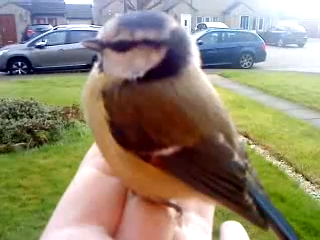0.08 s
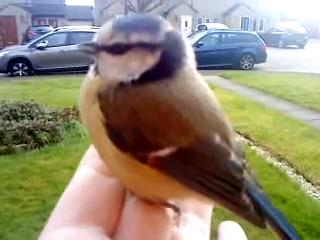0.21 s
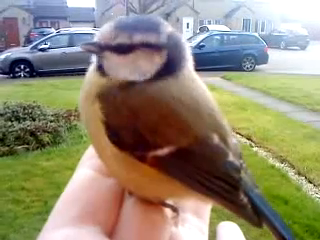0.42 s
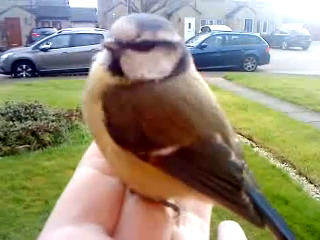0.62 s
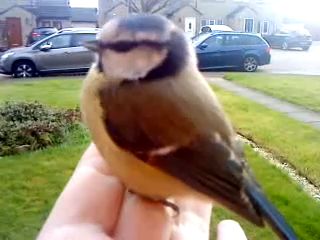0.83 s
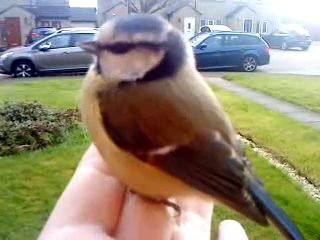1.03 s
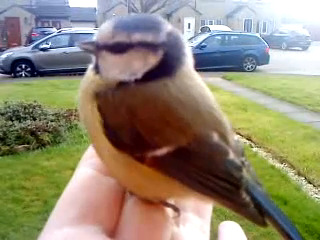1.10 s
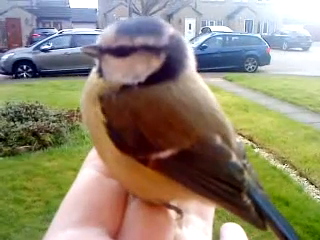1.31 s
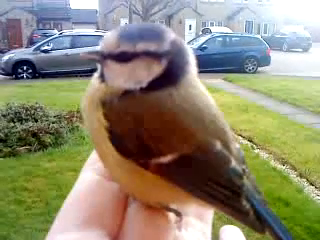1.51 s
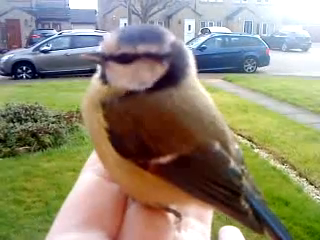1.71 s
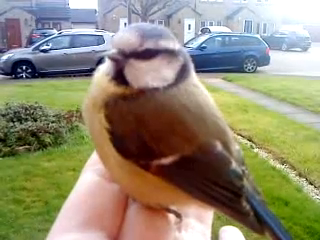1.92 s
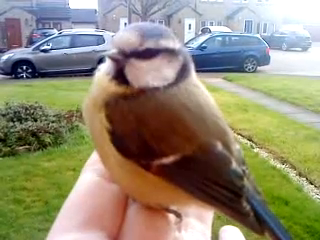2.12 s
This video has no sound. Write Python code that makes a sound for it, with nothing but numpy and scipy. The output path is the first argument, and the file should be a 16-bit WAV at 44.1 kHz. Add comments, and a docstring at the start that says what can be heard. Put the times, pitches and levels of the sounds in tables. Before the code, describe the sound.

Quick scratchy chirps from a tiny garden bird, following wind buffets and low thumping outdoors

```python
"""Wind buffets and thumps a microphone in a garden, over a distant engine, soft air hiss and an early swish.
Then a small tit perched on a hand gives seven short, dry, rasping calls close by, among soft ticks of noise.
Each call is a quick rattle of sharp pulses that ring near 4 kHz, with short echoes from the surroundings.
During the early calls a second bird far away gives two thin, falling whistles, made from gliding sine waves.
Wind, hiss and ticks are filtered noise, each thump is one smooth push, and the engine is a few sine waves."""
import sys
import numpy as np
from scipy import signal
from scipy.fft import rfft, irfft
from scipy.io import wavfile
from scipy.ndimage import uniform_filter1d

SR = 44100
rng = np.random.default_rng(int(sys.argv[2]) if len(sys.argv) > 2 else 0)


def wrap_up_sound(samples):
    """Save the sound to the file named by the first command line argument, as 16-bit audio."""
    columns = np.atleast_2d(samples).T
    # keep every value between -1 and 1, then stretch to whole-number steps
    tamed = np.clip(columns, -1, 1)
    steps = np.round(tamed * 32767).astype(np.int16)
    wavfile.write(sys.argv[1], SR, steps)


N = 94815
T = np.arange(N) / SR  # time of every sample, in seconds

# Near calls, two quick rattles each: an opening, then a run of closer pulses.
# Columns: start t/s, number of pulses, gap t/s, level/dB, fade per pulse/dB (negative grows), pitch f/Hz, rasp/dB
RATTLES = [ (.8310, 2, 0.0057, -23, -1.5, 4140, -21), (.8440, 7, 0.0028, -28, 0.9, 4040, -28),
           (1.0409, 1, .003, -8, 1, 3970, -19), (1.0434, 5, 0.0019, -6.5, 0.9, 3920, -17.5),
           (1.2060, 1, .003, -8.5, 2, 4050, -13), (1.2107, 3, 0.0018, -7.5, 3.5, 3830, -17),
           (1.3592, 1, .003, -8.5, 2, 3950, -17.5), (1.3647, 3, 0.0019, -21.5, 6, 3900, -7),
           (1.5153, 1, 0.0027, -14, 2, 4100, -30), (1.5189, 4, .0017, -12, -0.5, 3970, -10),
           (1.6920, 2, 0.0017, -5.5, 3, 4020, -25), (1.6963, 3, 0.0016, -9.5, 3.5, 3930, -12.5),
           (1.8511, 2, 0.003, -14, 2, 4100, -24), (1.8595, 5, .0022, -11, 3, 3890, -9)]
# Small unevenness from pulse to pulse; the tuning is a fraction of the pitch
TIMING_SPREAD_S, STRENGTH_SPREAD_DB, TUNING_SPREAD = 0.00018, 0.9, 0.019

# Resonances of throat and beak at the reference pitch: f/Hz, width/Hz, level/dB
THROAT_RESONANCES = [(600, 380, -22.5), (2000, 440, -18.5), (3084, 1070, -14), (3730, 920, 3),
                     (4113, 483, 2.5), (5720, 520, -16), (7300, 240, -31.5)]
# Starting direction of each resonance: +1 or -1
THROAT_SIGNS = [1, 1, 1, 1, -1, -1, -1]
REFERENCE_HZ, PULSE_LENGTH_S, PULSE_ATTACK_S = 4000, 0.008, 0.00015
RASP_PEAK_S, RASP_LOW_HZ, RASP_HIGH_HZ = 0.00066, 1630, 4860  # breathy burst on every pulse

# Short soft noise bursts around the calls: centre t/s, length t/s, level/dB, wide hiss against narrow band/dB
NOISE_BURSTS = [(.691, 0.0045, -45.5, -21), (.8765, 0.0045, -43, -16), (1.037, 0.014, -36, -4),
                (1.056, .003, -42, -17), (1.217, 0.0034, -35, -17), (1.246, 0.024, -50, 0),
                (1.387, 0.0035, -45, -3), (1.542, .003, -37.5, 0), (1.669, 0.0064, -41, 7),
                (1.713, 0.0043, -40, 1.5), (1.880, 0.013, -42, -1.5), (1.987, 0.0023, -49.5, -6),
                (2.108, 0.011, -49.5, -3)]
BURST_HZ, BURST_WIDTH_HZ, BURST_LOW_HZ, BURST_HIGH_HZ = 4080, 450, 1500, 7000

# Echo strength, and the time each echo takes to fall by 60 dB
ECHO_DB, ECHO_T60_S, TAIL_DB, TAIL_T60_S = -14, 0.025, -21, 0.11

# Far whistles: start t/s, length t/s, start f/Hz, end f/Hz, level/dB
WHISTLES = [(.89, .13, 7520, 6850, -66), (1.125, .11, 7380, 6850, -66)]
WHISTLE_WAVER_HZ, WHISTLE_FLICKER_DB = 50, 2.5

# Wind strength at the microphone: t/s, level/dB
WIND = [(0, -51), (.16, -43.5), (.25, -32), (.32, -42.5), (.48, -35), (.59, -23), (.70, -30), (.78, -23.5),
        (.89, -30), (.94, -33), (1.18, -31.5), (1.24, -23.5), (1.30, -34.5), (1.47, -33), (1.60, -27),
        (1.68, -33), (1.78, -42), (2.15, -39.5)]
WIND_LOW_HZ, WIND_HIGH_HZ = 13, 68.4
# Buffeting has level BUFFET_DB in a strong wind and gains BUFFET_GROWTH dB per dB of wind
BUFFET_HIGH_HZ, BUFFET_DB, BUFFET_GROWTH, STRONG_WIND_DB = 139, -26, 1.91, -25.5
# Gusts that break into flutter: start t/s, length t/s, level/dB, upper edge f/Hz
GUSTS = [(0.382, 0.056, -37, 228), (0.509, 0.027, -29, 242), (.567, 0.063, -21, 260.5),
         (0.634, 0.041, -31, 290), (.738, 0.081, -26.5, 261), (0.755, 0.022, -32.5, 532),
         (0.841, 0.0245, -27.5, 292), (1.204, 0.053, -32, 246)]
GUST_LOW_HZ, GUST_ATTACK_S, GUST_RELEASE_S = 94, 0.005, 0.014
# Single eddies thump the microphone: centre t/s, peak level/dB, pitch f/Hz
THUMPS = [(0.251, -24, 31), (0.403, -20.5, 39.3), (.526, -14, 85), (.767, -11.5, 69), (0.88, -13.5, 59),
          (1.029, -16, 93), (1.084, -24.5, 44.5), (1.136, -14.5, 60.5), (1.2228, -13, 263),
          (1.378, -14.5, 116), (1.515, -11, 102.6), (1.548, -11.5, 88), (1.671, -19.5, 70)]
THUMP_REBOUND = 1.37  # how strongly the pressure swings the other way before and after the peak

# Distant engine: t/s, firing rate f/Hz, level/dB
ENGINE = [(0, 152.4, -50), (.3, 144.4, -45.5), (.55, 140.9, -52.5), (1.3, 135.6, -54), (1.95, 123.8, -51.5),
          (2.15, 123.5, -53)]
# Engine tones: multiple of the firing rate, level/dB
ENGINE_ORDERS = [(1, -0.5), (2, 2.5), (3, -11.5)]
ENGINE_WAVER, ENGINE_FLICKER_DB = 0.0154, 4  # the waver is a fraction of the firing rate

# Soft mid-range hiss that dies away early: t/s, level/dB
SWISH = [(0, -65), (.3, -58), (.55, -64), (.8, -79)]
SWISH_HZ, SWISH_WIDTH_HZ = 2480, 2200

# Tone colour of the outdoor hiss: f/Hz, relative level per Hz/dB
AIR_COLOUR = [(20, 1), (100, -10), (200, -10.5), (380, -12.5), (550, -22), (1000, -26), (2000, -31),
              (4000, -33), (5200, -37), (7500, -40.5), (9000, -52)]
# Slow changes of the outdoor hiss: t/s, level/dB relative to AIR_DB
AIR_LEVEL = [(0, 1.5), (.5, 1), (1.1, 1), (2.15, 2)]
AIR_DB = -43.5

CUTOFF_HZ = 9400


def from_db(db):
    """Turn decibels into a gain."""
    return 10 ** (np.asarray(db) / 20)


def rms_one(x):
    """Scale a sound to an average strength (rms) of 1."""
    return x / np.sqrt(np.mean(x ** 2) + 1e-20)


def in_time(rows):
    """Join the rows of a table by straight lines, giving one curve per column after the time."""
    s, *columns = np.transpose(rows)
    return [np.interp(T, s, column) for column in columns]


def shaped_noise(gain_at):
    """Noise of strength 1 whose frequencies are weighted by a given function."""
    hz = np.maximum(np.fft.rfftfreq(N, 1 / SR), 1)
    spectrum = rfft(rng.standard_normal(N))
    return rms_one(irfft(spectrum * gain_at(hz), N))


def drift(rate_hz):
    """Slow random wandering around zero with a spread of 1."""
    return shaped_noise(lambda hz: 1 / (1 + (hz / rate_hz) ** 2))


def turbulence(low_hz, high_hz, steepness):
    """Tumbling air as low noise between two edges, with its slow swings in strength evened out."""
    def gain_at(hz):
        below = 1 + (low_hz / hz) ** 2
        above = 1 + (hz / high_hz) ** steepness
        return 1 / np.sqrt(below * above)

    noise = shaped_noise(gain_at)
    local_power = uniform_filter1d(noise ** 2, size=2600)  # average over about 59 ms
    return noise / np.sqrt(local_power + 1e-9)


def add(out, s, sound):
    """Mix a short sound in at a time in seconds."""
    i = int(s * SR)
    out[i:i + len(sound)] += sound[:max(N - i, 0)]


def pulse(pitch_hz, rasp_db):
    """One sharp pulse makes throat and beak ring for a millisecond or two, with a breathy burst of rasp."""
    t = np.arange(int(PULSE_LENGTH_S * SR)) / SR
    hz, width, db = np.transpose(THROAT_RESONANCES)[:, :, None]
    # A wider resonance dies away faster
    decay = np.exp(-np.pi * width * t)
    rings = from_db(db) * decay * np.sin(2 * np.pi * hz * pitch_hz / REFERENCE_HZ * t)
    attack = 1 - np.exp(-t / PULSE_ATTACK_S)

    band = signal.butter(2, [RASP_LOW_HZ, RASP_HIGH_HZ], "band", fs=SR, output="sos")
    breath = rms_one(signal.sosfilt(band, rng.standard_normal(len(t))))
    rasp = breath * t / RASP_PEAK_S * np.exp(-t / RASP_PEAK_S)
    return attack * (THROAT_SIGNS @ rings) + from_db(rasp_db) * rasp


def near_bird():
    """The tit's calls: rattles whose pulses are a little uneven in time, strength and pitch."""
    out = np.zeros(N)
    for s, count, gap, db, fade_db, hz, rasp_db in RATTLES:
        for k in range(round(count)):
            late, strong, sharp = rng.standard_normal(size=3)
            start = s + k * gap + TIMING_SPREAD_S * late
            gain = from_db(db - k * fade_db + STRENGTH_SPREAD_DB * strong)
            add(out, start, gain * pulse(hz * (1 + TUNING_SPREAD * sharp), rasp_db))
    return out


def noise_bursts():
    """Brief ticks and noise bursts around the calls, some closing a call: a narrow band plus wide hiss."""
    def wide_gain(hz):
        below = 1 + (BURST_LOW_HZ / hz) ** 6
        above = 1 + (hz / BURST_HIGH_HZ) ** 8
        return 1 / np.sqrt(below * above)

    core = shaped_noise(lambda hz: 1 / np.hypot(1, 2 * (hz - BURST_HZ) / BURST_WIDTH_HZ))
    hiss = shaped_noise(wide_gain)
    out = np.zeros(N)
    for s, length, db, bright_db in NOISE_BURSTS:
        swell = np.exp(-(2 * (T - s) / length) ** 2)
        out += from_db(db) * swell * rms_one(core + from_db(bright_db) * hiss)
    return out


def garden(x):
    """Quick scatter from hand and body, and a faint tail from the surroundings, as fading noise echoes."""
    out = np.zeros(N)
    for db, t60 in ((ECHO_DB, ECHO_T60_S), (TAIL_DB, TAIL_T60_S)):
        echo = rng.standard_normal(N) * from_db(-60 * T / t60)
        echo = echo * (T > 0.002)  # no echo in the first 2 ms
        out += from_db(db) * signal.fftconvolve(x, echo / np.linalg.norm(echo))[:N]
    return out


def far_bird():
    """Thin whistles whose pitch sags ever faster, with a little waver and flicker."""
    out = np.zeros(N)
    for s, length, start_hz, end_hz, db in WHISTLES:
        u = np.clip((T - s) / length, 0, 1)  # 0 at the start of the whistle, 1 at its end
        hz = start_hz + (end_hz - start_hz) * u ** 2 + WHISTLE_WAVER_HZ * drift(82)
        swell = np.sqrt(np.abs(np.sin(np.pi * u)))
        tone = np.sin(2 * np.pi * np.cumsum(hz) / SR)
        out += from_db(db + WHISTLE_FLICKER_DB * drift(46)) * swell * tone
    return out


def flutter():
    """Short gusts break into faster turbulence, rising quickly and falling more slowly."""
    out = np.zeros(N)
    for s, length, db, edge_hz in GUSTS:
        rise = np.clip((T - s) / GUST_ATTACK_S, 0, 1)
        fall = np.clip((s + length - T) / GUST_RELEASE_S, 0, 1)
        out += from_db(db) * rise * fall * turbulence(GUST_LOW_HZ, edge_hz, steepness=10.24)
    return out


def thumps():
    """Each eddy presses or pulls once on the microphone, with an opposite swing on both sides."""
    out = np.zeros(N)
    for s, db, hz in THUMPS:
        u = (np.pi * hz * (T - s)) ** 2
        direction = rng.choice([-1, 1])
        out += direction * from_db(db) * (1 - THUMP_REBOUND * u) * np.exp(-u)
    return out


def wind():
    """A deep rumble, buffeting that grows faster than the wind, flutter in gusts, and single thumps."""
    wind_db, = in_time(WIND)
    rumble = from_db(wind_db) * turbulence(WIND_LOW_HZ, WIND_HIGH_HZ, steepness=6.06)
    buffet_db = BUFFET_DB + BUFFET_GROWTH * (wind_db - STRONG_WIND_DB)
    buffeting = from_db(buffet_db) * turbulence(WIND_HIGH_HZ, BUFFET_HIGH_HZ, steepness=8.5)
    return rumble + buffeting + flutter() + thumps()


def engine():
    """A far engine slowly drops in speed, humming at whole multiples of its firing rate."""
    hz, db = in_time(ENGINE)
    wavering_hz = hz * (1 + ENGINE_WAVER * drift(18))
    phase = 2 * np.pi * np.cumsum(wavering_hz) / SR
    out = np.zeros(N)
    for multiple, order_db in ENGINE_ORDERS:
        level_db = db + order_db + ENGINE_FLICKER_DB * drift(12)
        out += from_db(level_db) * np.sin(round(multiple) * phase)
    return out


def swish():
    """A broad band of noise that has almost faded away when the calls begin."""
    hiss = shaped_noise(lambda hz: 1 / (1 + (2 * (hz - SWISH_HZ) / SWISH_WIDTH_HZ) ** 2))
    return from_db(in_time(SWISH)[0]) * hiss


def air():
    """Smooth outdoor hiss: noise that follows the tone colour table and changes level slowly."""
    hz, db = np.transpose(AIR_COLOUR)
    hiss = shaped_noise(lambda f: from_db(np.interp(np.log(f), np.log(hz), db)))
    return from_db(AIR_DB + in_time(AIR_LEVEL)[0]) * hiss


def scene():
    """All sources add up at one microphone; the calls and noise bursts also bring echoes."""
    close = near_bird() + noise_bursts()
    birds = close + garden(close) + far_bird()
    background = wind() + engine() + swish() + air()
    return (birds + background)[None]  # one channel


def record(dry):
    """A steep filter removes the treble, by at least 70 dB from the cutoff upwards."""
    return signal.sosfilt(signal.cheby2(14, 70, CUTOFF_HZ, fs=SR, output="sos"), dry)


dry = scene()
out = record(dry)
wrap_up_sound(out)
```